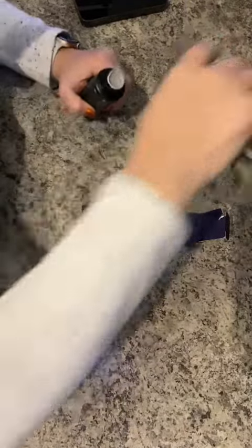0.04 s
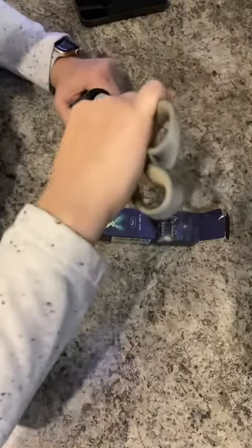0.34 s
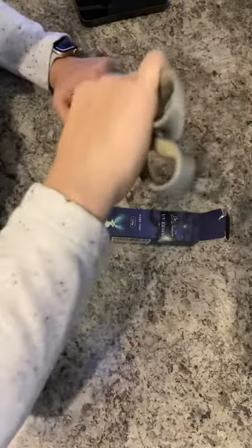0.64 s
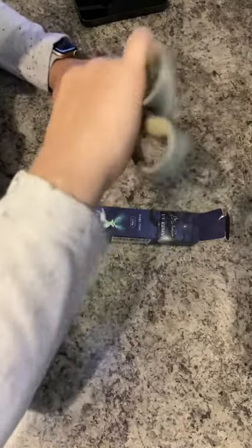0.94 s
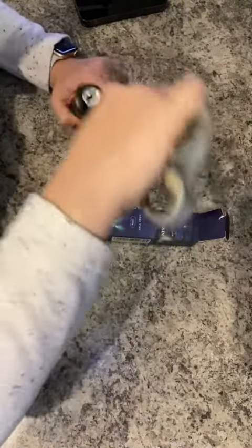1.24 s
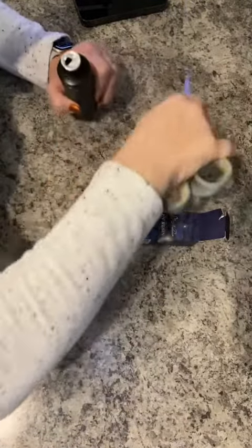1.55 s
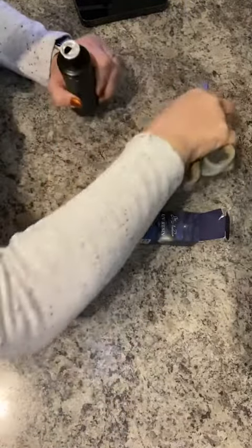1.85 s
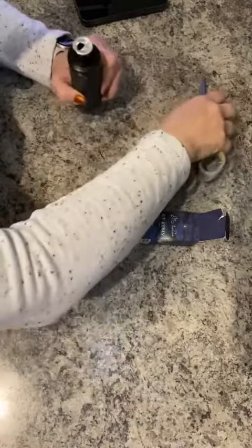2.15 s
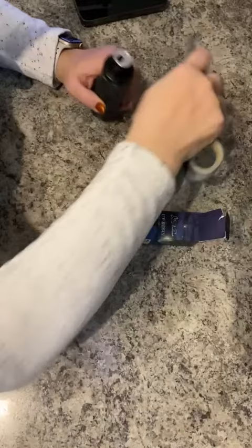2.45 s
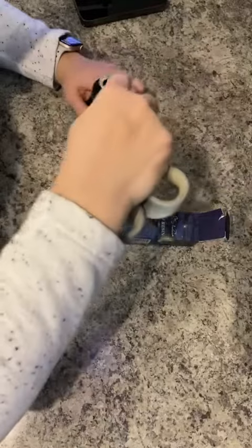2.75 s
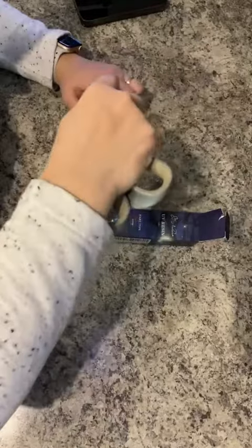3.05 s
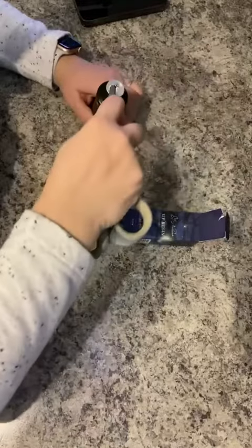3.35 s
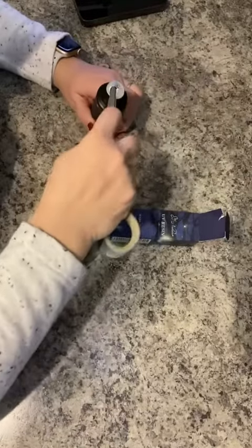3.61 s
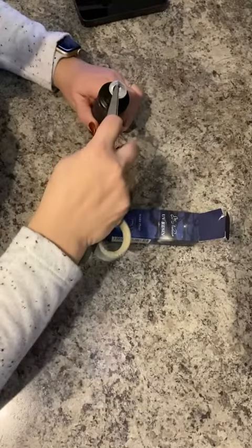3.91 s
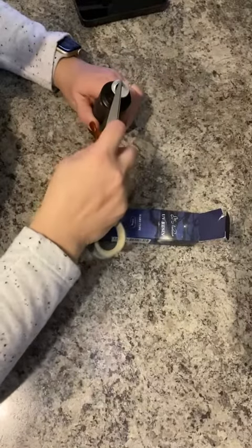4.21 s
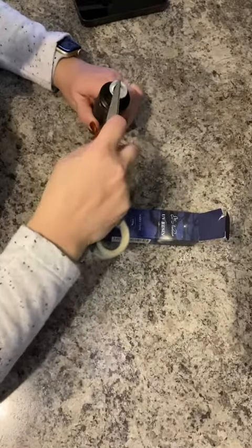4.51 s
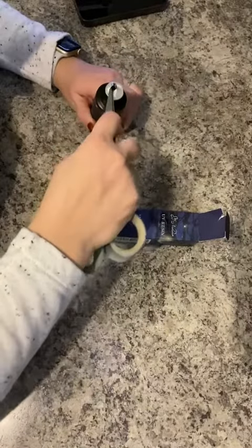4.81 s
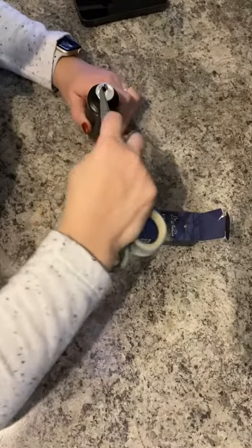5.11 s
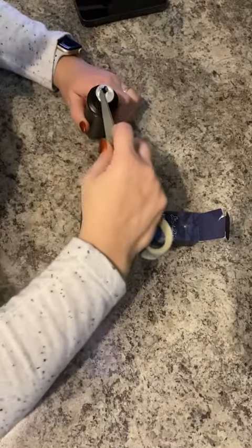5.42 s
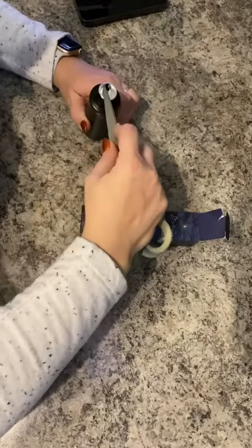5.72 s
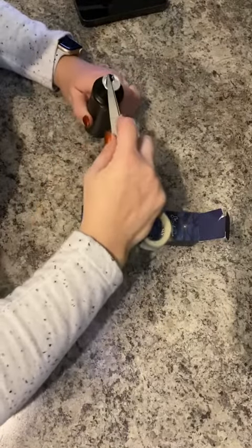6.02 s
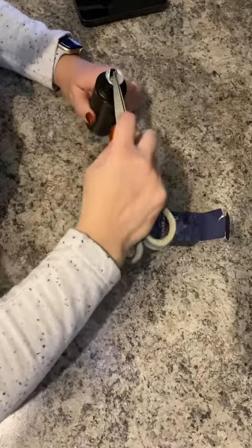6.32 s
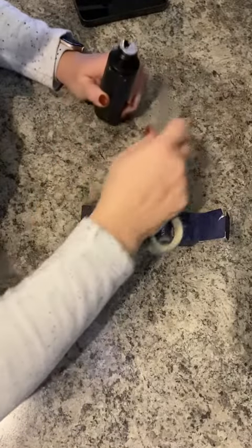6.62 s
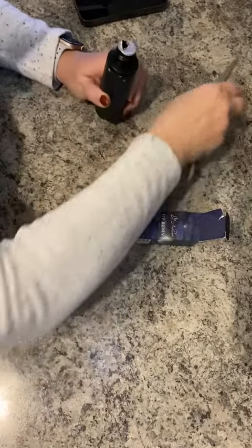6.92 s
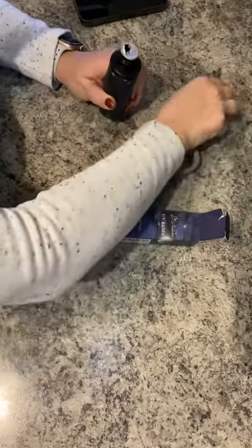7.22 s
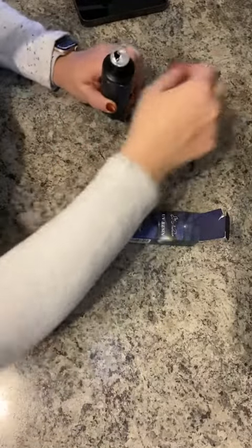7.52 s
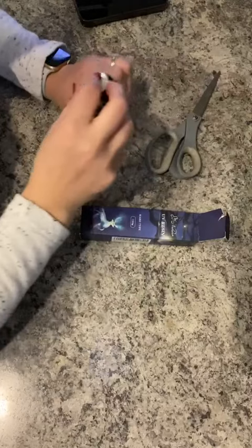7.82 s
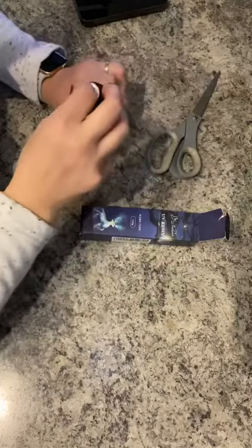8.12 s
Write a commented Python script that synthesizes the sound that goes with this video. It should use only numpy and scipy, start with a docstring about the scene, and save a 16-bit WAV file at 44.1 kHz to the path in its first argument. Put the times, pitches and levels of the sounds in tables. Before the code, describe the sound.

At about 0.2 and 0.6 seconds, scissor tips jab a small plastic bottle's foil seal, each jab thudding into a stone counter, the second with a sharp click. Around 0.9 seconds another thud comes with a bright, ringing scrape of steel and two tiny pops as the seal gives. The scissors tap the counter lightly at 2.1 seconds, and the bottle knocks hollowly just after. Small foil scrapes and plastic clicks lead to a softer thud at 2.7 seconds. From 3 to 6.5 seconds there are only sparse, faint blade ticks, pops and scrapes, with a crisp foil crackle near 3.9 seconds. From 7 seconds the scissors tap the stone several times, then land with a loud clatter at about 7.3 seconds and quickly rattle to rest. Everything is close, in a small, lively room with a faint, steady low hum.

```python
"""A small, lively room with a stone counter and a low hum, heard by a close two-port microphone.
Scissor tips are jabbed through the foil seal of a small plastic bottle, and each jab drives the
counter's low modes into a thud. The foil crackles, air pockets under it pop and the steel blades ping
as the hole is widened; then the scissors are put down with a clatter. Every click is a brief, noisy
contact force filtered by the resonances of the object it strikes."""
import sys
import numpy as np
from scipy import signal
from scipy.fft import rfft, irfft, next_fast_len
from scipy.io import wavfile
from scipy.ndimage import uniform_filter1d

SR = 44100
rng = np.random.default_rng(int(sys.argv[2]) if len(sys.argv) > 2 else 0)


def wrap_up_sound(samples):
    """Save the sound to the file named by the first command line argument, as 16-bit audio."""
    columns = np.atleast_2d(samples).T
    # keep every value between -1 and 1, then stretch to whole-number steps
    tamed = np.clip(columns, -1, 1)
    steps = np.round(tamed * 32767).astype(np.int16)
    wavfile.write(sys.argv[1], SR, steps)


N = 368398
HZ = np.fft.rfftfreq(4096, 1 / SR)  # frequency grid of one contact


# Jabs on the bottle. Each row: start in seconds, force in dB, corner frequency in Hz (lower is softer).
JAB_PUSHES = [(0.208, -5.5, 340), (0.609, 2, 126), (.89, -4, 543), (0.974, -9, 69.6), (2.66, -8.5, 320),
              (3.116, -22, 270), (4.771, -26.5, 230)]

def counter(tap_db=-14, tap_hz=500, set_down_db=-7, landing_db=-5, landing_hz=200, landing_lag_s=0.0033):
    """Impact excitation: jabs, taps and landings thud into the stone; a first reflection prolongs each."""
    taps = [(s, db + weight_db + tap_db, tap_hz) for s, _, db, weight_db, *_ in SCISSOR_TAPS]
    set_down = (BOTTLE_ROCKING[0], BOTTLE_ROCKING[2] + set_down_db, tap_hz)
    landing = (SCISSOR_LANDINGS[0][0] + landing_lag_s, SCISSOR_LANDINGS[0][2] + landing_db, landing_hz)
    direct = thuds(JAB_PUSHES + taps + [set_down, landing])
    echo = np.zeros(N)
    add(echo, s=0.0173, sound=amp(-8.5) * direct)
    return room(direct + echo, wet_db=-16.5)


# Modes of the counter. Each row: frequency in Hz, level in dB, time to decay by 60 dB in seconds.
COUNTER_MODES = [(44.87, -41.5, 0.1), (59.5, -34, 0.22), (84, -31.5, 0.084), (112.2, -24, 0.19),
                 (148.3, -31, 0.14), (189.5, -32, 0.16), (289.6, -26.5, 0.067), (334.8, -35.5, 0.1),
                 (366.4, -35.5, 0.018), (507, -31.5, 0.065)]

def thuds(pushes, rise_s=0.004, travel_s=0.00041):
    """Modal superposition: a softer push excites fewer modes, and the deepest arrive last."""
    out, t = np.zeros(N), np.arange(SR // 2) / SR
    onset = 1 - np.exp(-t / rise_s)
    for s, force_db, corner_hz in pushes:
        for hz, db, t60 in COUNTER_MODES:
            strength = amp(force_db + db - 60 * t / t60) / np.sqrt(1 + (hz / corner_hz) ** 4)
            delay_s = travel_s * np.sqrt(COUNTER_MODES[0][0] / hz)
            add(out, s + delay_s, 2 * strength * onset * np.sin(2 * np.pi * hz * t))
    return out


# Pricks, tears and scrapes of the seal. Each row: start in seconds, contact time in ms, level in dB.
FOIL_CONTACTS = [(0.885, 1.3, -29), (1.296, 0.43, -55.5), (2.433, 5.8, -29), (2.52, 4.3, -33.5),
                 (3.8341, 1.4, -37.5), (3.8458, 1.8, -27.5), (3.8977, 1.2, -42), (3.901, 1.7, -40),
                 (3.905, 1.5, -42), (3.91, 1.6, -39.5), (3.917, 1.3, -49), (3.951, .6, -59.5),
                 (3.978, 1.5, -40), (5.5912, 1.2, -42.5), (5.5941, 0.96, -41), (6.411, 34, -40),
                 (6.49, 16, -39)]
# Resonances of the foil. Each row: frequency in Hz, bandwidth in Hz, gain in dB.
FOIL_MODES = [(3440, 720, 11.6), (4230, 670, 4.2), (5627, 750, 3.8), (12200, 1300, 0.51)]

def foil(body_db=-5.5):
    """Contact time limits bandwidth: short pricks of the seal are crisp, long scrapes are dull."""
    rows = [(s, ms, db + body_db, db, treble(db, ms, snap_db=4.5, dulling_db=7))
            for s, ms, db in FOIL_CONTACTS]
    return room(contacts(rows, FOIL_MODES, bass_db=4, top_db=2.5), wet_db=-7)


# Air popping under the seal. Each row: start in seconds, level in dB, settled pitch in Hz.
AIR_POPS = [(.972, -35.5, 840), (.984, -36.5, 889), (3.011, -51.5, 1313), (3.015, -50.5, 820),
            (4.566, -46.5, 888), (4.773, -62.5, 840), (6.346, -58, 925)]

def pops(bend=0.28, settle_s=0.0019, swell_s=0.0016):
    """Cavity resonance: as the tip breaks in, the air pocket rings for a few cycles, falling in pitch."""
    out, t = np.zeros(N), np.arange(SR // 20) / SR
    envelope = (t / swell_s) ** 2 * np.exp(-t / swell_s)
    for s, db, hz in AIR_POPS:
        cycles = np.cumsum(hz * (1 + bend * np.exp(-t / settle_s))) / SR
        add(out, s, amp(db) * envelope / envelope.max() * np.sin(2 * np.pi * cycles))
    return out


# Blades touching and sliding. Each row: start in seconds, contact time in ms, level in dB,
# ping frequency in Hz, ping gain in dB, gain of the other resonances in dB.
BLADE_CONTACTS = [(0.8885, 1.9, -10.5, 5250, 17.5, 2), (0.941, 14, -18, 5200, 16, 4),
                  (.952, 9.2, -14, 5150, 25, 3), (.9625, 5.8, -13, 5320, 24, 0.5),
                  (0.976, 5.7, -15, 5110, 19, -4), (0.9823, 5, -25, 5180, 24, -14.5),
                  (3.005, 8.6, -32, 5660, 15, -1.5), (3.387, 14.7, -33, 5450, 19, -5),
                  (4.236, 4.7, -37, 5320, 10.5, -14), (4.5588, 0.65, -43, 5480, 21, -4.5),
                  (5.568, 0.41, -48.5, 5450, 18, -18.5), (5.5954, .7, -44.5, 5560, 20, -16.5),
                  (6.341, 9.9, -44, 5590, 19, -7.5)]
# Resonances of the blades. Each row: frequency in Hz, bandwidth in Hz, gain in dB.
STEEL_MODES = [(1850, 210, 6), (2360, 150, 9), (3050, 160, 8), (6900, 130, 14), (7800, 630, 6),
               (9190, 180, 5.5), (11660, 320, 6)]

def blades(body_db=3, ping_width_hz=34):
    """Lightly damped resonance: steel on steel rings brightly, with one ping that the grip retunes."""
    out = np.zeros(N)
    for s, ms, db, ping_hz, ping_db, ring_db in BLADE_CONTACTS:
        modes = [(hz, width, mode_db + ring_db) for hz, width, mode_db in STEEL_MODES]
        modes.append((ping_hz, ping_width_hz, ping_db))
        row = (s, ms, db + body_db, db, treble(db, ms, snap_db=7, dulling_db=6))
        out += contacts([row], modes, bass_db=-10.5, top_db=-4.5)
    return room(out, wet_db=-8)


# Held scissors tapping the stone. Each row: start in seconds, contact time in ms, level in dB, weight
# behind the tap in dB, ring outside and inside the free band in dB each, half-width of that band in Hz.
SCISSOR_TAPS = [(2.0801, 0.84, -26, -2, -2, 16, 171), (2.083, 1.9, -23.5, 9.5, 2, 18.5, 170),
                (2.0993, 1.6, -21, 7.5, -3, 13.5, 170), (7.0495, 2.1, -2.5, -4.5, -14, 8.5, 432),
                (7.1271, 2.26, -11.5, -2, -13, 6.5, 420), (7.1932, 2.37, -12, -4.5, -2, 1.5, 450),
                (7.208, 3.2, -12, 2, -3.5, 4.5, 300), (7.268, 3.1, -12.5, -4, -5.5, 5, 450),
                (7.3067, 4.2, -8, 0.5, -2, 2, 250)]
# Released scissors landing. Each row: start in seconds, contact time in ms, level in dB, weight in dB.
SCISSOR_LANDINGS = [(7.3257, 1.09, -2.5, -2.5), (7.3287, 0.91, -9.5, -3), (7.3345, 5.7, -4, -2),
                    (7.342, 2.2, 5.5, 2.5), (7.3456, 5.6, 1.5, 4.5), (7.3633, 1.3, -1.5, -1),
                    (7.3832, 3.5, 0.5, -4), (7.389, 2.1, -5.5, -6.5)]
# Their last rattle: start in seconds, contact time in ms, level in dB, first gap in seconds,
# loss per bounce in dB.
SCISSOR_ROCKING = (7.3995, 3, -3, .0115, 3.5)
# Resonances of the handles. Each row: frequency in Hz, bandwidth in Hz, gain in dB.
HANDLE_MODES = [(514, 29, 6.4), (603, 60, 3), (1070, 24, 11.7), (1167, 23, 4.3), (1329.6, 16, 12.5),
                (1367, 16, 12), (1640, 47, 5), (2080, 100, 7.9), (2280, 43, 4.5), (2443, 37, 6.8),
                (2585, 220, 7.5), (3400, 400, 2), (4340, 400, 6.2)]

def handles(free_band_hz=2385, released_ring_db=-5, settle_weight_db=-0.4):
    """Selective damping: gripped scissors ring mostly in one band; let go, they clatter in all modes."""
    out = np.zeros(N)
    for s, ms, db, weight_db, outer_db, free_db, span_hz in SCISSOR_TAPS:
        modes = []
        for hz, width, mode_db in HANDLE_MODES:
            freedom = np.exp(-((hz - free_band_hz) / span_hz) ** 4)
            modes.append((hz, width, mode_db + outer_db + (free_db - outer_db) * freedom))
        row = (s, ms, db + weight_db, db, treble(db, ms, snap_db=1.5, dulling_db=13.5))
        out += contacts([row], modes, bass_db=6.5, top_db=-17)
    settle = [(*row, settle_weight_db) for row in bounces(*SCISSOR_ROCKING)]
    drop = [(s, ms, db + weight_db, db, treble(db, ms, snap_db=0.5, dulling_db=10), released_ring_db)
            for s, ms, db, weight_db in SCISSOR_LANDINGS + settle]
    return room(out + contacts(drop, HANDLE_MODES, bass_db=3.5, top_db=-6), wet_db=-3.5)


# The neck clicking and rubbing. Each row: start in seconds, contact time in ms, level in dB,
# ring gain in dB, pitch factor set by the squeeze.
NECK_CLICKS = [(0.599, 1.15, -15, 8.5, 1), (2.4439, 2, -24, 0.5, 1), (2.565, 22, -36.5, 7, 0.71),
               (2.604, 3.3, -35.5, 0.5, 0.7), (2.789, 2.3, -42.5, 6, 1.4), (2.964, 3.7, -48, 21.5, 0.51),
               (3.029, 3.5, -33, 12.5, 0.72), (3.073, 14, -34.5, 6, 0.9), (3.11, 2.2, -39.5, 13, .9),
               (4.32, 16, -43, -3, 0.61), (4.772, 2.6, -39.5, 13.5, 1.2)]
# The bottle set down: start in seconds, contact time in ms, level in dB, first gap in seconds,
# loss per bounce in dB.
BOTTLE_ROCKING = (2.2103, 3.6, -16, .0155, 4.5)
# Resonances of the bottle. Each row: frequency in Hz, bandwidth in Hz, gain in dB.
BOTTLE_MODES = [(370, 120, 5.7), (1075, 60, 5), (1950, 180, 3), (2307, 140, 2.7), (2547, 153, 1.3)]

def bottle(base_body_db=10, neck_body_db=-7, lead_s=0.0014, knock_ms=3.2, knock_db=-16.5, firm_hz=318):
    """Shell resonance: the base knocks hollowly when jabbed or set down; the neck clicks thinly."""
    # the knock comes just before the thud, 11.5 dB weaker for each octave by which the jab is softer
    knocks = [(s - lead_s, knock_ms, db + knock_db + 11.5 * np.log2(corner_hz / firm_hz))
              for s, db, corner_hz in JAB_PUSHES]
    base = [(s, ms, db + base_body_db, db, treble(db, ms, snap_db=-9, dulling_db=7))
            for s, ms, db in knocks + bounces(*BOTTLE_ROCKING)]
    neck = [(s, ms, db + neck_body_db, db, treble(db, ms, snap_db=-12, dulling_db=2.5), ring_db, pitch)
            for s, ms, db, ring_db, pitch in NECK_CLICKS]
    return room(contacts(base + neck, BOTTLE_MODES, bass_db=-8.5, top_db=-2), wet_db=-6)


# Faint squeaks. Each row: peak time in seconds, half-length in seconds, pitch in Hz, level in dB.
SKIN_RUBS = [(1.571, 0.08, 2050, -90.5), (2.895, 0.017, 2000, -85), (3.612, 0.036, 1980, -87),
             (7.789, 0.06, 1917, -86.5)]

def rubs(width_hz=110):
    """Friction noise: skin slipping on plastic gives a narrow band that swells and fades."""
    out, t = np.zeros(N), np.arange(SR // 2) / SR
    hz = np.fft.rfftfreq(len(t), 1 / SR)
    for s, half_s, pitch_hz, db in SKIN_RUBS:
        band = 1 / (1 + ((hz - pitch_hz) / width_hz) ** 2)
        squeak = unit_rms(irfft(rfft(rng.standard_normal(len(t))) * band))
        swell = np.exp(-((t - t.mean()) / half_s) ** 2)
        add(out, s - t.mean(), amp(db) * squeak * swell)
    return out


def contacts(rows, modes, bass_db, top_db):
    """Source and filter: a cluster of tiny slips rings the object, a click if short, a scrape if long."""
    out, t = np.zeros(N), np.arange(1, 2 * len(HZ) - 1) / SR
    noises = rng.standard_normal((len(rows), len(t)))
    for (s, ms, low_db, mid_db, high_db, *grip), slips in zip(rows, noises):
        progress = t / (ms / 1000)
        force = slips * progress * np.exp(-progress * np.sqrt(2))
        # the slips give only the fine grain; the hardness of the contact gives the broad colour
        smooth_spectrum = np.sqrt(np.abs(uniform_filter1d(abs(rfft(force)) ** 2, size=22)) + 1e-12)
        colour = [(200, low_db + bass_db), (600, low_db), (2400, mid_db),
                  (8000, high_db), (15000, high_db + top_db)]
        gain = amp(curve(colour, HZ)) * ringing(modes, *grip) / smooth_spectrum
        add(out, s, signal.fftconvolve(force, minimum_phase(gain)))
    return out


def ringing(modes, ring_db=0, pitch=1, spot_db=8, spot_from_hz=400):
    """Modal response: the main resonances stand over lesser ones that vary with the spot struck."""
    ripple = uniform_filter1d(rng.standard_normal(len(HZ)), size=16)
    ripple = unit_rms(uniform_filter1d(ripple, size=16))
    lesser = unit_rms(amp(spot_db * np.tanh(ripple) * HZ / (HZ + spot_from_hz)))
    main_power = sum(amp(db + ring_db) ** 2 / (1 + (2 * (HZ - hz * pitch) / width) ** 2)
                     for hz, width, db in modes)
    return np.sqrt(lesser ** 2 + main_power)


def treble(db, ms, snap_db, dulling_db):
    """Contact low-pass at 8 kHz: a 1 ms contact gains snap_db; each doubling of it loses dulling_db."""
    return db + snap_db - dulling_db * np.log2(ms)


def bounces(s, ms, db, gap_s, loss_db, count=3, gap_ratio=0.96):
    """Inelastic rebound: an object rocks to rest in ever quicker, weaker contacts."""
    gaps = gap_s * gap_ratio ** np.arange(count)
    return [(s + gaps[:k].sum(), ms, db - k * loss_db) for k in range(count)]


# Colour of the echo as heard, dull above 12 kHz. Each row: frequency in Hz, gain in dB.
ECHO_COLOUR = [(200, 3.5), (500, 0), (2500, 1), (7000, -2.5), (11000, -5), (13500, -16.5)]
# Decay of the echo as heard, very short above 12 kHz. Each row: frequency in Hz, 60 dB decay in seconds.
ECHO_DECAY = [(100, 0.31), (500, 0.19), (2300, 0.25), (5000, 0.2), (11000, 0.195), (13500, 0.059)]
# Direct sound at the ports. Each row: frequency in Hz, phase lead of the left in radians.
DIRECT_LEAD = [(300, 0), (600, -.3), (800, -1.5), (1050, 0), (1450, .6), (1900, -.1), (2500, -.9),
               (2900, -2.5), (4500, -1.6), (6000, 0), (8000, -.9), (10000, -1.7), (13000, -3)]

def room(x, wet_db, build_s=0.0061):
    """Reverberation: a dense echo builds up after the direct sound and decays band by band."""
    hz, t, spectra = signal.stft(rng.standard_normal((2, SR // 2)), SR, nperseg=256)
    fade_db = curve(ECHO_COLOUR, hz)[:, None] - 60 * t / curve(ECHO_DECAY, hz)[:, None]
    tail = signal.istft(spectra * amp(fade_db), SR, nperseg=256)[1]
    onset = 1 - np.exp(-(np.arange(tail.shape[1]) / SR / build_s) ** 2)
    tail = diffuse(tail * onset)
    size = next_fast_len(N, True)
    direct = phase_pair(rfft(x, size), DIRECT_LEAD, size)[:, :N]
    echo = signal.fftconvolve(x[None], tail / np.linalg.norm(tail[0]), axes=1)[:, :N]
    return direct + amp(wet_db) * echo


# Likeness of diffuse sound at the ports. Each row: frequency in Hz, coherence (negative counts as zero).
COHERENCE = [(60, 0.99), (110, 1), (200, 0.93), (380, 0.58), (700, -0.32), (1290, -0.46), (2380, -0.39),
             (4400, -0.021), (8120, 0.35), (15000, -0.04)]
# Diffuse sound at the ports. Each row: frequency in Hz, phase lead of the left in radians.
DIFFUSE_LEAD = [(430, 0), (620, -2.1), (1050, -3), (2000, -2.5), (4200, -2.7), (5200, -1.3), (6300, -.3),
                (8000, -.9), (10000, -1.8), (13000, -3)]

def diffuse(pair):
    """Partial coherence: sound from all around reaches the two ports partly alike and shifted in phase."""
    size = next_fast_len(pair.shape[1], True)
    a, b = rfft(pair, size)
    coherence = np.clip(curve(COHERENCE, np.fft.rfftfreq(size, 1 / SR)), 0, 1)
    shared, apart = np.sqrt((1 + coherence) / 2) * a, np.sqrt((1 - coherence) / 2) * b
    return phase_pair(np.array([shared + apart, shared - apart]), DIFFUSE_LEAD, size)[:, :pair.shape[1]]


# Balance of the ports. Each row: frequency in Hz, left minus right level in dB.
LEVEL_DIFFERENCE = [(100, 0), (420, 0), (620, -3), (880, -10), (1100, -5), (1400, -4), (1750, 0),
                    (2300, 1.5), (3200, -3), (4800, -2.5), (6000, 0)]

def ports(x):
    """Interchannel level difference: sound from the counter reaches the two ports unequally."""
    hz, side = np.fft.rfftfreq(N, 1 / SR), np.array([[.5], [-.5]])
    return irfft(rfft(x) * amp(side * curve(LEVEL_DIFFERENCE, hz)), N)


# Low hum near 59 and 117 Hz, with faint wavering room tones at 283 and 496 Hz.
# Each row: frequency in Hz, level in dB, waver as a share of the steady amplitude.
BACKGROUND_TONES = [(58.85, -55, 0.3), (117.2, -60.5, 1.2), (283, -83, 2.3), (496, -83.5, 1.5)]

def hum_and_room_tones(waver_hz=6):
    """Random modulation: the low hum and the faint room tones waver slowly in amplitude and phase."""
    out, hz, t = np.zeros(N), np.fft.rfftfreq(N, 1 / SR), np.arange(N) / SR
    for tone_hz, db, waver in BACKGROUND_TONES:
        drift = unit_rms(irfft(rfft(rng.standard_normal((2, N))) / (1 + (hz / waver_hz) ** 2)))
        modulation = 1 + waver * (drift[0] + 1j * drift[1])
        out += amp(db) * unit_rms((modulation * np.exp(2j * np.pi * tone_hz * t)).real)
    return out


# Spectrum of the room air. Each row: frequency in Hz, relative spectral density in dB.
AIR_SPECTRUM = [(15, -60), (25, -33.5), (40, -19), (64, -3), (86, -13), (118, -7.5), (176, -19), (231, -17),
                (271, -27), (293, -23.5), (501, -31), (811, -40), (1300, -50.5), (2100, -50), (3200, -55),
                (5000, -58.5), (8100, -62), (11500, -62.5), (14000, -73)]

def room_air(level_db=-65, above_hz=150):
    """Diffuse noise field: a steady rumble and hiss, scaled by its part above the deep bass."""
    hz = np.fft.rfftfreq(N, 1 / SR)
    spectrum = rfft(diffuse(rng.standard_normal((2, N)))) * amp(curve(AIR_SPECTRUM, hz))
    return amp(level_db) * irfft(spectrum) / irfft(spectrum * (hz > above_hz)).std()


# Arm movements. Each row: peak time in seconds, half-length in seconds, level in dB.
ARM_REACHES = [(0.018, 0.16, -74.5), (1.61, 0.24, -92), (6.842, 0.13, -98.5), (7.777, 0.18, -85)]
# Spectrum of the cloth. Each row: frequency in Hz, relative spectral density in dB.
CLOTH_SPECTRUM = [(300, -18.5), (1000, -5.5), (2000, 1.5), (3200, -1), (7000, -1), (10000, -3.5),
                  (15000, -26)]

def sleeve(rest_db=-90):
    """Broadband friction noise: a faint rustle of cloth swells with each reach."""
    hz, t = np.fft.rfftfreq(N, 1 / SR), np.arange(N) / SR
    spectrum = rfft(diffuse(rng.standard_normal((2, N)))) * amp(curve(CLOTH_SPECTRUM, hz))
    swells = sum(amp(db) * np.exp(-((t - s) / half_s) ** 2) for s, half_s, db in ARM_REACHES)
    return unit_rms(irfft(spectrum)) * (amp(rest_db) + swells)


def amp(db):
    """Decibels to amplitude ratio."""
    return 10 ** (np.asarray(db) / 20)


def unit_rms(x):
    """Normalisation to an rms of 1."""
    return x / np.sqrt(np.mean(x ** 2) + 1e-20)


def curve(points, hz):
    """Interpolation of (Hz, value) points on a logarithmic frequency axis."""
    f, value = np.transpose(points)
    return np.interp(np.log(hz + 1), np.log(f + 1), value)


def add(mix, s, sound):
    """Superposition of a sound on the mix at s seconds."""
    part = mix[round(s * SR):][:len(sound)]
    part += sound[:len(part)]


def minimum_phase(gain):
    """Minimum phase: the promptest impulse response with this gain."""
    log_gain = np.log(np.maximum(np.r_[gain, gain[-2:0:-1]], 1e-6))
    return np.fft.ifft(np.exp(signal.hilbert(log_gain).conj())).real


def phase_pair(spectra, phase, size):
    """Interchannel phase difference: two channels from spectra, the left leading by this phase."""
    lead = curve(phase, np.fft.rfftfreq(size, 1 / SR))
    return irfft(spectra * np.exp(1j * np.array([[.5], [-.5]]) * lead), size)


def scene():
    """Superposition: each source with its share of the room, over air, hum and sleeve."""
    action = blades() + handles() + bottle() + foil() + room(pops() + rubs(), wet_db=-10.5) + counter()
    return ports(action) + room_air() + hum_and_room_tones() + sleeve()


def record(dry, low_cut_hz=39, high_cut_hz=15800):
    """Band limiting: the deepest bass and the treble above 15.8 kHz are removed."""
    hz = np.fft.rfftfreq(N, 1 / SR)
    heard = irfft(rfft(dry) / np.sqrt(1 + (low_cut_hz / (hz + 1)) ** 10), N)
    low_pass = signal.firwin(511, high_cut_hz, window=("kaiser", 9), fs=SR)
    return signal.oaconvolve(heard, low_pass[None], "same")


dry = scene()
out = record(dry)
wrap_up_sound(out)
```